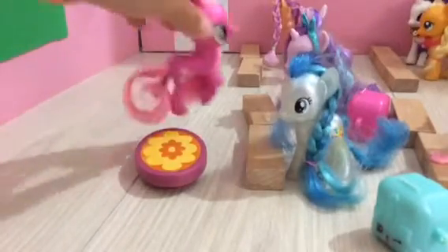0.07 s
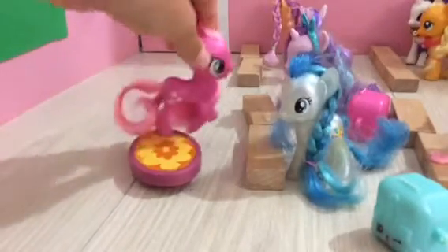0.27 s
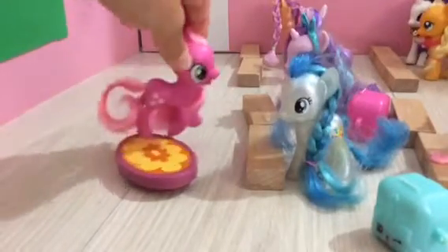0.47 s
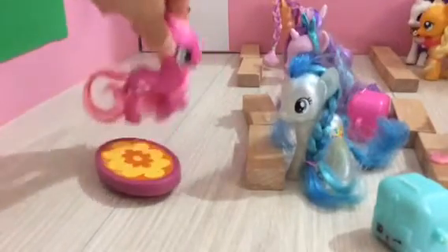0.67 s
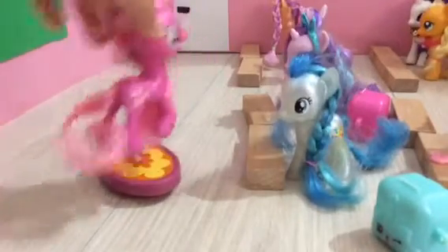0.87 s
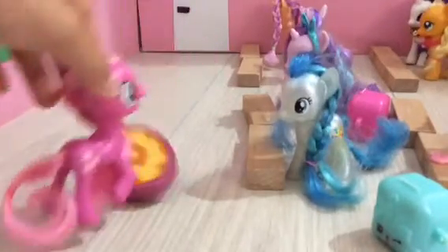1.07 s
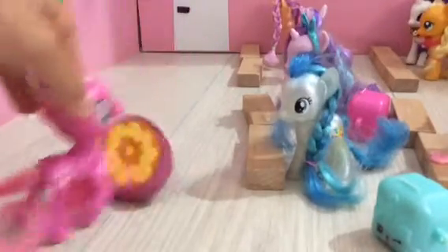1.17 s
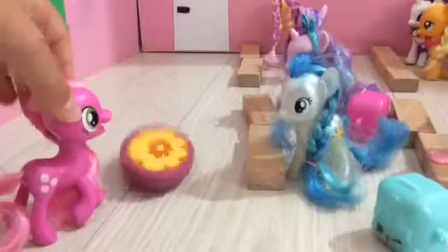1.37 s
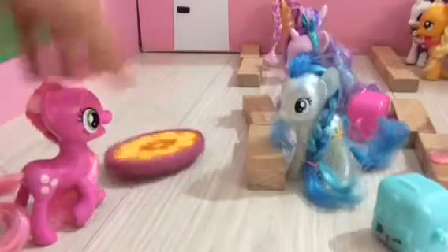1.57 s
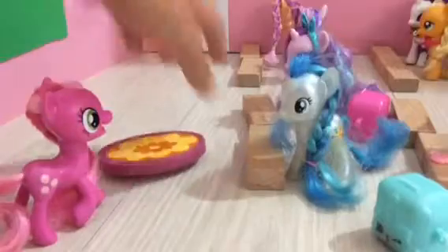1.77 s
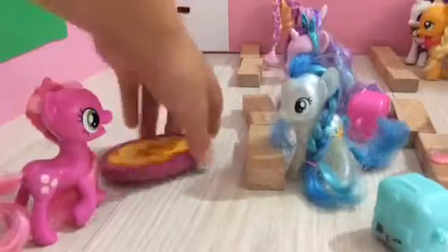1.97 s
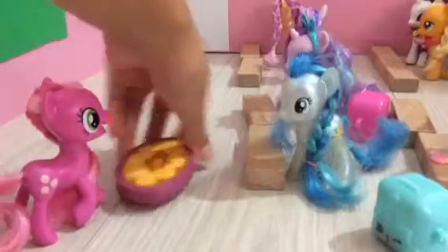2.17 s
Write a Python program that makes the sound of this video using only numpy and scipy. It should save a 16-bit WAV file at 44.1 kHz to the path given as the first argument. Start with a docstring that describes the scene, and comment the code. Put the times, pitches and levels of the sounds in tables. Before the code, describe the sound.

A hollow plastic disc clatters on a laminate floor. A sharp knock at 0.3 s leaves small scrapes and weak clicks around 0.6 s. Near-quiet follows, with a very faint hum from 0.75 to 1.1 s. From 1.15 s it taps and rocks in a dry, uneven rattle, brightest near 1.74 s, stopping by 1.85 s. Soft ticks come after 2 s. Small room, low rumble, close microphone.

```python
"""Hollow plastic clatter: a plastic figure taps a toy disc, which rocks and rattles round its rim on a laminate floor.
Contacts are short runs of clicks, and rolling is a dense stream of them; both set the disc's modes ringing.
Blows and rolling also shake the low modes of the floor boards; dry ticks are puffs of noise.
The small quiet room has rumble and hiss from shaped noise; sines make a brief, nearly steady hum and a faint far whistle."""
import sys
import numpy as np
from scipy import signal
from scipy.fft import rfft, irfft
from scipy.io import wavfile
from scipy.ndimage import uniform_filter1d

SR = 44100
rng = np.random.default_rng(int(sys.argv[2]) if len(sys.argv) > 2 else 0)


def boost(x):
    """Linear amplitude factor 10**(x/20) for a level x in decibels (scalar or array-like)."""
    u = np.asarray(x, float) / 20
    return 10 ** u


def to_wav(sig):
    """Store sig (one row per channel, or 1-D mono) as 16-bit WAV at the path in sys.argv[1].

    Samples outside -1..1 are clipped; the rate is SR.
    """
    pcm = np.clip(np.atleast_2d(sig), -1, 1) * 32767
    pcm = np.round(pcm).astype(np.int16)
    wavfile.write(sys.argv[1], SR, pcm.T)  # frames by channels


N = 98475

# Colour of the room's rumble and hiss. Each row: frequency in Hz, relative level in dB per Hz.
AIR = [(12, -35.5), (20, -13.5), (126, -2), (225, -9.5), (266, -9.5), (597, -21), (667, -21.5), (788, -20),
       (906, -22), (1410, -30.5), (3640, -33), (13500, -31.5), (15500, -36)]
# Path of the brief, nearly steady hum. Each row: time in seconds, pitch in Hz, level in dB.
HUM = [(0.74, 206, -84), (0.754, 201.7, -67.5), (1.052, 207.8, -69.5), (1.056, 207, -81), (1.1, 204, -77)]
# Path of the faint far whistle. Each row: time in seconds, pitch in Hz, level in dB.
WHISTLE = [(.70, 3660, -86), (.735, 3680, -84), (.785, 3940, -82), (.818, 3480, -81), (.824, 3450, -90)]
# Dry ticks of fingers and toy hair. Each row: start in seconds, level in dB before filtering, lower band edge in Hz.
TICKS = [(0.2528, -56.5, 8000), (0.507, -52, 6860), (1.031, -61, 4500), (2.069, -52.5, 8400),
         (2.11, -54.5, 8500), (2.154, -52.5, 4800), (2.199, -47.5, 5400)]
# Low modes of the floor boards. Each row: pitch in Hz, relative level in dB, time to fall by 60 dB in seconds.
BOARD_MODES = [(172.5, -45.5, 0.23), (243.8, -24.5, 0.14), (267.5, -11, 0.025), (375, -10.5, 0.034)]
# Blows that reach the boards. Each row: start in seconds, relative strength in dB before a small random change.
THUMPS = [(0.2972, -16.5), (.312, -35), (0.358, -31.5), (0.422, -39.5), (1.155, -26), (1.184, -36),
          (1.225, -25), (1.29, -23), (1.34, -37), (1.40, -44), (1.445, -34), (1.541, -32)]
# Rolling and sliding of the rim, one list for each stretch; the last stretch is mostly a faint rise of hiss.
# Each row: time in seconds, relative level in dB, brightness in dB (per octave in the disc's modes).
ROLL = [
    [(.3, -45, 12), (.342, -69.5, 5.5), (.40, -63, -4), (.464, -67.5, -2.5), (.51, -68, -2.5),
     (.558, -69, -1.5), (.575, -60, -0.5), (.61, -56.5, -1.5), (.645, -56.5, 5.5), (.686, -57.5, -4.5),
     (.715, -74, 1.5), (.76, -93, 11), (.83, -83, 3)],
    [(1.16, -67, 9), (1.20, -78, 4), (1.225, -48, -6), (1.26, -50, -7), (1.285, -50, -8), (1.328, -45, -6),
     (1.356, -43.5, -7.5), (1.40, -53.5, -5), (1.43, -55, -5.5), (1.47, -61, 0.5), (1.535, -57, -4),
     (1.56, -48, 1.5), (1.60, -51.5, -2), (1.645, -54, -9.5), (1.67, -45, -6), (1.70, -57, -6),
     (1.73, -54.5, 0.5), (1.76, -51, -9), (1.81, -50.5, 0.5), (1.85, -62.5, 0), (1.92, -77.5, -4)],
    [(2.01, -64, -7), (2.03, -62.5, 1.5), (2.07, -58.5, -4), (2.11, -73, 4.5), (2.19, -69.5, -3),
     (2.21, -69, 3.5), (2.233, -53, -2)],
]
# Modes of the disc. Each row: pitch in Hz, relative level in dB, time to fall by 60 dB in seconds.
DISC_MODES = [(494, -36, 0.013), (610.4, 0.5, 0.031), (670.5, -6.5, 0.022), (811, 0.5, 0.02),
              (906, -7, 0.0087), (1190, 3, 0.02), (1497, -6, 0.023), (1593, -3.5, 0.027), (1957, 2.5, 0.01),
              (2178, 4.5, 0.01), (2320, -10.5, 0.014), (2744, -5, 0.027), (3205, -6, 0.0075),
              (3678, 3.5, 0.0063), (4135, 8.5, 0.0053), (4546, 10, 0.0037), (4998, -8.5, 0.017),
              (5460, -6, 0.0064), (6000, -17, 0.0033)]
# Sharp contacts; where the disc is struck decides which group of modes answers.
# Each row: start in seconds, then relative strength in dB of the modes near 2 kHz, 550 Hz, 1 kHz and 4.5 kHz.
TAPS = [(0.2967, -19.5, -10, -13.5, -19), (0.299, -27, -45, -27.5, -50), (0.3077, -23, -26, -39, -25),
        (0.327, -30.5, -28, -47, -52), (0.407, -60, -39, -46, -53), (0.4237, -45.5, -54, -42.5, -62),
        (0.429, -67, -47, -40, -63), (0.4379, -63, -61, -47.5, -65), (0.452, -67, -67, -47, -59),
        (0.5645, -67, -61, -45.5, -57), (0.6088, -40, -58, -32, -40.5), (0.636, -31, -62, -35.5, -35.5),
        (0.6607, -64, -67, -27, -60), (1.155, -21.5, -23, -30, -23), (1.225, -16, -35, -23, -29.5),
        (1.2404, -27, -59, -39, -59), (1.2893, -24.5, -16.5, -20.5, -33.5), (1.306, -32, -42, -63, -71),
        (1.3569, -20.5, -23, -44, -43.5), (1.3696, -28, -31, -31.5, -38.5), (1.555, -26.5, -24, -43, -40),
        (1.6069, -21, -45, -27, -36.5), (1.6159, -16, -20, -18, -23), (1.673, -24, -45, -48, -26),
        (1.7392, -17, -36.5, -23, -6), (1.8154, -45, -41, -52, -52), (2.02, -48, -56, -45, -56),
        (2.062, -59.5, -28, -55, -62), (2.1232, -51.5, -50, -40, -66), (2.206, -69, -41, -49, -51)]
# The rim rocks down and scuffs, swelling then fading. Each row: the same columns as the taps.
ROCKS = [(0.283, -51, -48, -57, -54), (0.309, -35.5, -51, -24, -40), (0.586, -72, -70, -49, -66),
         (0.622, -55, -64, -36, -63), (0.639, -63, -65, -38, -58), (1.225, -47, -55, -59, -54),
         (1.2795, -32.5, -59, -37, -49), (1.362, -24.5, -26, -23, -36), (1.375, -26, -52, -32, -43),
         (1.383, -34, -32, -40, -44), (1.389, -42.5, -47, -33, -67), (1.4411, -19, -16, -24.5, -28.5),
         (1.453, -20, -31, -31, -34.5), (1.5408, -16, -26, -15, -21.5), (1.623, -19, -21, -35, -30),
         (1.632, -27.5, -35, -35, -64), (1.6755, -19, -29.5, -20, -23), (1.686, -27, -54.5, -35, -71.5),
         (1.734, -47, -52.5, -45, -36), (1.7385, -17, -40, -15.5, -47), (1.768, -32.5, -48, -19.5, -29.5),
         (1.7712, -25, -39, -29, -19.5), (1.778, -29.5, -30, -33.5, -50.5), (1.79, -20.5, -46, -28, -26.5),
         (1.804, -48, -33.5, -54, -56), (2.037, -42, -74, -33, -51), (2.043, -27.5, -39, -26, -30),
         (2.185, -89, -61, -56.5, -60)]
# Borders of the mode groups in Hz: low to mid, mid to upper, then the start and end of the blend from upper to high.
GROUP_EDGES_HZ = [700, 1400, 2450, 3000]
# Short bursts of high treble at some of the contacts. Each row: start in seconds, relative level in dB.
TREBLE_BURSTS = [(1.2245, -23.5), (1.362, -24.5), (1.543, -7), (1.617, -43), (1.7395, 0), (1.7695, -10),
                 (1.7945, -19.5)]

AIR_DB = -64   # overall rms level
TICK_S = 0.005   # time for a tick to fall to 37 percent
SHUDDER_S, SHUDDER_DB = 0.03, -30.5   # the boards go on shaking after a blow
ROLL_DISC_DB, ROLL_CRACK_DB, ROLL_BOARDS_DB = -5.5, 11, -0.5   # how strongly rolling drives each
ROLL_PER_S, CHATTER_PER_S = 5500, 14000   # average clicks per second
CHATTER_SPREAD_DB = 2.0   # unevenness of the click sizes
FIRST_CLICK_DB = -2   # added at the start of a tap's chatter
TAP_S, ROCK_S = 0.0038, 0.003   # decay of a tap's chatter at 1.5 kHz, swell time of a rock
TAP_SHORTENS = 0.15   # power of frequency by which a tap's chatter dies sooner in the treble
MODE_SCATTER_DB, STRIKE_DB, DISC_CUT_HZ = 1.5, -9, 365
SKIRT = 1.22   # each mode is filtered to within this factor of its pitch
CRACK_DB, CRACK_LOW_HZ, CRACK_HIGH_HZ = -2.5, 7430, 9440   # airy edge of each click
CRACK_FOLLOWS_HIGH = 0.44   # share of the high group; the rest follows the 2 kHz group
ROOM_T60_S, ROOM_DB, WALL_CUT_HZ = 0.2, -15, 7000
MIC_CUT_HZ, TOP_CUT_HZ = 10, 15900


def air():
    """Steady room rumble and hiss: random noise with its spectrum shaped by a table."""
    hz, db = np.transpose(AIR)
    f = np.maximum(np.arange(N // 2 + 1) * SR / N, 1)
    colour = boost(np.interp(np.log(f), np.log(hz), db))
    x = irfft(rfft(rng.standard_normal(N)) * colour, N)
    return boost(AIR_DB) * x / np.std(x)


def in_time(rows):
    """Join each column by straight lines; the last value says whether the time lies inside the table."""
    s, *columns = np.transpose(rows)
    t = np.arange(N) / SR
    return [np.interp(t, s, c) for c in columns] + [(t >= s[0]) & (t <= s[-1])]


def tone(rows):
    """Hum or whistle: a faint sine that follows its pitch and level, with softened ends."""
    hz, db, inside = in_time(rows)
    fade = uniform_filter1d(inside * 1., size=300)
    return np.sqrt(2) * boost(db) * fade * np.sin(2 * np.pi * np.cumsum(hz) / SR)


def dying(s, decay_s):
    """A level that starts at 1 at a given time and dies away evenly in dB."""
    t = np.arange(N) / SR
    return (t > s) * np.exp(-np.abs(t - s) / decay_s)


def ticks():
    """Fingers and toy hair: short puffs of bright noise, each in a band of its own."""
    noise, out = rng.standard_normal(N), np.zeros(N)
    for s, db, hz in TICKS:
        band = signal.butter(2, [hz, 1.52 * hz], "band", fs=SR, output="sos")
        out += boost(db) * dying(s, TICK_S) * signal.sosfilt(band, noise)
    return out


def ring(clicks, hz, t60):
    """A mode acts like a struck spring: a unit click sets a dying sine ringing from a height of about 1."""
    r, w = boost(-60 / (t60 * SR)), 2 * np.pi * hz / SR
    return signal.lfilter([0, np.sin(w)], [1, -2 * r * np.cos(w), r * r], clicks + 1e-18)


def boards(roll):
    """One dull click and a shudder for each blow, and the rolling, set the low modes of the floor ringing."""
    s, db = np.transpose(THUMPS)
    out, t = np.zeros(N), np.arange(SR // 5) / SR
    for hz, mode_db, t60 in BOARD_MODES:
        shaking = boost(SHUDDER_DB) * np.exp(-t / SHUDDER_S) * rng.standard_normal(len(t))
        shudder = (t == 0) + shaking
        clicks = roll * boost(ROLL_BOARDS_DB)
        clicks[(s * SR).astype(int)] += boost(db + 1.0 * rng.standard_normal(40)[:len(s)])
        clicks = signal.fftconvolve(clicks, shudder)[:N]
        out += boost(mode_db) * ring(clicks, hz, t60)
    return signal.sosfilt(signal.butter(3, [130, 700], "band", fs=SR, output="sos"), out)


def grains(per_s):
    """Rough surfaces give random clicks of uneven size and sign; on average one unit of energy a millisecond."""
    happens = rng.random(N) < per_s / SR
    size = boost(CHATTER_SPREAD_DB * np.minimum(rng.exponential(1, N), 4))
    x = happens * size * rng.choice([-1, 1], N)
    return x / np.sqrt(np.mean(x ** 2) * SR / 1000)


def rolling():
    """The rim rubs the floor: dense clicks follow the rolling level; their brightness is returned too."""
    rub, roll, bright = grains(ROLL_PER_S), np.zeros(N), np.zeros(N)
    for rows in ROLL:
        level_db, bright_db, inside = in_time(rows)
        roll += boost(level_db) * inside * rub
        bright += bright_db * inside
    return roll, bright


def chatter(gains, clicks, hz, width_hz):
    """A tap is a first click and a dying run of smaller ones; the run of a rock swells, then fades."""
    t, is_tap = np.arange(1500) / SR, np.arange(len(gains))[:, None] < len(TAPS)
    starts = (np.array(TAPS + ROCKS)[:, 0] * SR).astype(int)
    tap_run = np.exp(-t / TAP_S * (hz / 1500) ** TAP_SHORTENS)
    rock_run = t / ROCK_S * np.exp(1 - t / ROCK_S)
    run = np.where(is_tap, tap_run, rock_run)
    bursts = run * clicks[starts[:, None] + np.arange(1500)]
    bursts[:, :1] += boost(FIRST_CLICK_DB) * is_tap
    # Even out the random energy near this pitch, so that each contact has the strength asked for.
    heard = 1 / (1 + (2 * (np.arange(751) * SR / 1500 - hz) / width_hz) ** 2)
    energy = np.abs(rfft(bursts)) ** 2 @ heard / heard.sum()
    wanted = np.sum(run ** 2, axis=1) * 1000 / SR
    bursts *= (gains * np.sqrt(wanted / energy))[:, None]
    out = np.zeros(N + 1500)
    for i, burst in zip(starts, bursts):
        out[i:i + 1500] += burst
    return out[:N]


def disc_body(roll, bright, clicks):
    """Contacts and rolling drive the same modes of the hollow disc, with scattered contact strengths in each."""
    _, upper_db, low_db, mid_db, high_db = np.transpose(TAPS + ROCKS)
    out = np.zeros(N)
    for hz, mode_db, t60 in DISC_MODES:
        blend = np.interp(hz, GROUP_EDGES_HZ[2:], [0, 1])
        top_db = (1 - blend) * upper_db + blend * high_db
        group_db = (low_db, mid_db, top_db)[np.searchsorted(GROUP_EDGES_HZ[:2], hz)]
        scatter_db = MODE_SCATTER_DB * rng.standard_normal(100)[:len(group_db)]
        hits = chatter(boost(group_db + STRIKE_DB + scatter_db), clicks, hz, 5.3 / t60)
        rub = roll * boost(ROLL_DISC_DB + bright * np.log2(hz / 1500))
        rung = ring(hits + rub, hz, t60)
        skirt = signal.butter(1, [hz / SKIRT, hz * SKIRT], "band", fs=SR)
        out += boost(mode_db) * signal.lfilter(*skirt, rung)
    return signal.sosfilt(signal.butter(4, [DISC_CUT_HZ, 7000], "band", fs=SR, output="sos"), out)


def disc_crack(roll, bright, clicks):
    """The airy edge of contacts and rolling, with added treble bursts: clicks kept to the high treble, no modes."""
    _, upper_db, _, _, high_db = np.transpose(TAPS + ROCKS)
    edge_db = CRACK_FOLLOWS_HIGH * high_db + (1 - CRACK_FOLLOWS_HIGH) * upper_db
    edge = chatter(boost(edge_db), clicks, CRACK_LOW_HZ, CRACK_HIGH_HZ)
    edge += roll * boost(ROLL_CRACK_DB + bright)
    for s, db in TREBLE_BURSTS:
        edge += clicks[N:] * boost(db) * dying(s, TAP_S)
    edge = signal.sosfilt(signal.butter(3, CRACK_LOW_HZ, "high", fs=SR, output="sos"), edge)
    edge = signal.sosfilt(signal.butter(3, CRACK_HIGH_HZ, fs=SR, output="sos"), edge)
    return boost(CRACK_DB) * edge


def disc(roll, bright):
    """The same random clicks feed the ringing body of the disc and its bright crack."""
    clicks = np.tile(grains(CHATTER_PER_S), 2)   # twice over, so that a late burst never runs out
    return disc_body(roll, bright, clicks) + disc_crack(roll, bright, clicks)


def room(x):
    """Early reflections and tail: noise that dies away, duller as it goes."""
    t = np.arange(int(.4 * SR)) / SR
    noise = rng.standard_normal(len(t))
    dull = signal.sosfilt(signal.butter(2, WALL_CUT_HZ, fs=SR, output="sos"), noise)
    tail = dull * boost(-60 * t / ROOM_T60_S)
    tail += (noise - dull) * boost(-90 * t / ROOM_T60_S)   # the treble dies faster
    tail *= t > .004
    return boost(ROOM_DB) * signal.fftconvolve(x, tail / np.sqrt(np.sum(tail ** 2)))[:N]


def scene():
    """Disc, boards and ticks sound in the room, over the background."""
    roll, bright = rolling()
    near = disc(roll, bright) + boards(roll) + ticks()
    in_room = near + room(near)
    return (in_room + air() + tone(HUM) + tone(WHISTLE))[None]


def top_cut(x):
    """Nothing passes above the cut-off."""
    return signal.sosfilt(signal.butter(12, 15670, fs=SR, output="sos"), x)


def record(dry):
    """The microphone drops the deepest bass, and a steep filter cuts the top."""
    x = signal.sosfilt(signal.butter(1, MIC_CUT_HZ, "high", fs=SR, output="sos"), dry)
    x = signal.sosfilt(signal.cheby2(20, 60, TOP_CUT_HZ, fs=SR, output="sos"), x)
    return top_cut(x)


dry = scene()
out = record(dry)
to_wav(out)
```